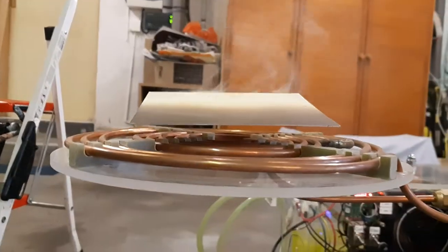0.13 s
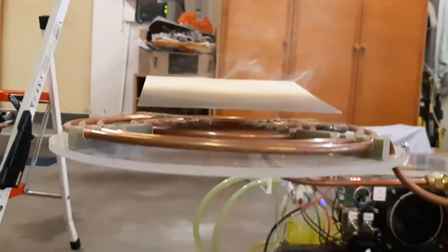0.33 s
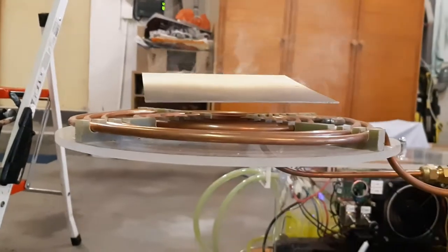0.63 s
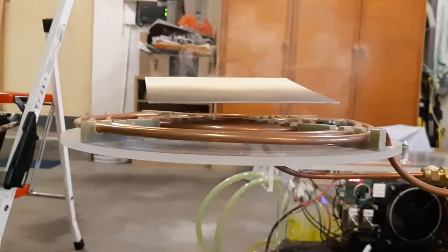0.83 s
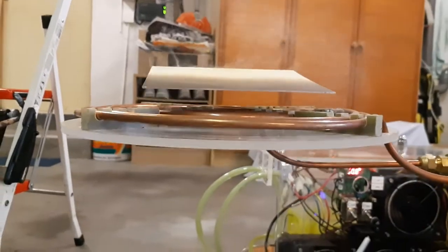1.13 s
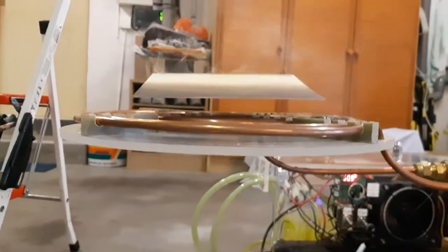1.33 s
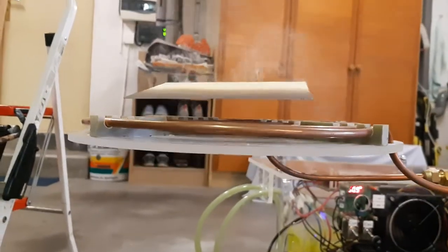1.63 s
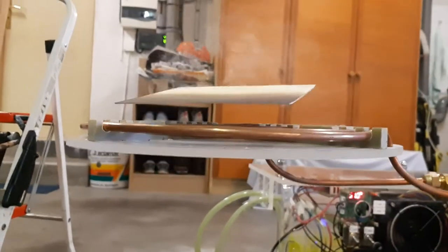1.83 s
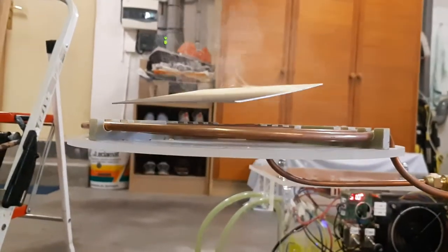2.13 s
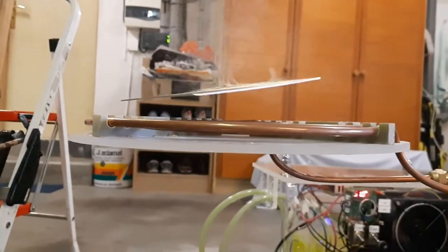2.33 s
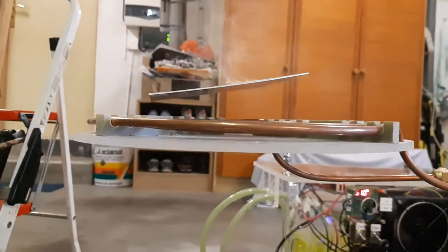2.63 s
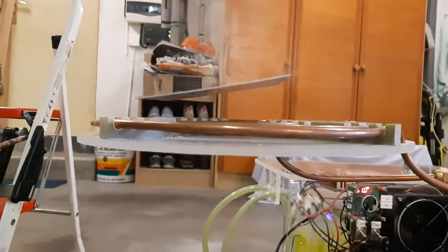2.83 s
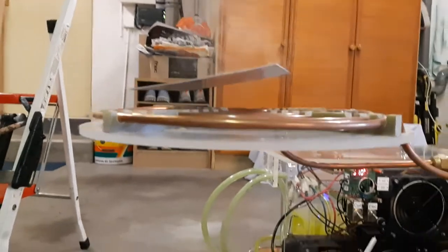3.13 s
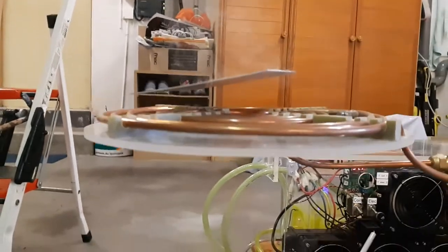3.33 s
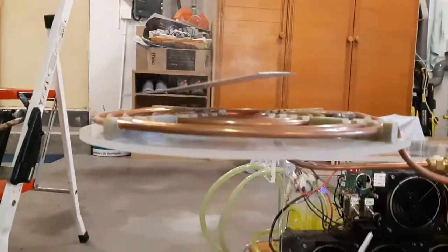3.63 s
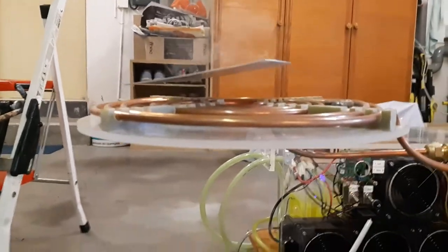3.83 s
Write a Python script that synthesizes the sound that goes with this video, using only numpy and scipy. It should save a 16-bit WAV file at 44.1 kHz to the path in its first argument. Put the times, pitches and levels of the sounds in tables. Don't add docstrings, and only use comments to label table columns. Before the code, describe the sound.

Cooling fan noise from a power unit, steady airy whoosh with a hollow low-mid hum

```python
import sys
import numpy as np
from scipy import signal
from scipy.fft import rfft, irfft, next_fast_len
from scipy.io import wavfile
from scipy.ndimage import uniform_filter1d

SR = 44100
rng = np.random.default_rng(int(sys.argv[2]) if len(sys.argv) > 2 else 0)


def digitize_waveform(pressure):
    field = np.atleast_2d(pressure).T
    bounded = np.clip(field, -1, 1)
    quanta = np.round(bounded * 32767).astype(np.int16)
    wavfile.write(sys.argv[1], SR, quanta)


def boost(x):
    u = np.asarray(x, float) / 20
    return 10 ** u


N = 175959
HZ = np.fft.rfftfreq(next_fast_len(N + 4096), 1 / SR)


def evened(x):
    return x / np.sqrt(np.mean(x ** 2) + 1e-20)


def sided(db, pan_db):
    return boost([[db + pan_db / 2], [db - pan_db / 2]])


def read(points):
    f, db = np.transpose(points)
    octaves, ends = np.log2(HZ + 1), np.log2(f)
    outside = np.maximum(ends[0] - octaves, 0) + np.maximum(octaves - ends[-1], 0)
    return boost(np.interp(octaves, ends, db) - 60 * outside)


def bands(centres_hz, rows, steep):
    power = 0
    for hz, (width_hz, db, pan_db) in zip(centres_hz, rows):
        resonance = 1 / (1 + (2 * (HZ - hz) / width_hz) ** 2) ** steep
        power = power + sided(db, pan_db) ** 2 * resonance
    return np.sqrt(power)


def slow(rate_hz):
    t = np.arange(0, N + 256, 256) / SR
    f = np.geomspace(rate_hz / 12, rate_hz, num=20)[:, None]
    sines = np.sin(2 * np.pi * (f * t + rng.random((20, 1))))
    drift = (sines / np.sqrt(f)).sum(0)
    return np.interp(np.arange(N) / SR, t, evened(drift))


def eddies(patchy_db, flicker_db, size):
    frames = N // 128 + 40
    a, b, patches = rng.standard_normal((frames, 257, 3)).T
    patches = uniform_filter1d(patches, size[0], 0)
    patches = evened(uniform_filter1d(patches, size[1], 1))
    flicker = evened(uniform_filter1d(rng.standard_normal(frames), size=9))
    cells = (a + 1j * b) * boost(patchy_db * patches + flicker_db * flicker)
    x = signal.istft(cells, nperseg=512, noverlap=384)[1]
    return rfft(evened(x), 2 * len(HZ) - 2) * np.sqrt(SR / 2)


def heard(spectrum, follow):
    # (time [s], level [dB])
    flow = [
        (0.0, -21),
        (0.31, -28),
        (0.44, -23.5),
        (1.78, -23.5),
        (2.04, -20.5),
        (2.09, -24.5),
        (2.73, -23),
        (2.74, -21),
        (3.68, -25),
        (3.99, -25),
    ]
    t, db = np.transpose(flow)
    swell_db = np.interp(np.arange(N) / SR, t, db) - db.mean()
    return irfft(spectrum)[:, 2000:2000 + N] * boost(follow * swell_db)


def lag(hz):
    # (frequency [Hz], phase [rad])
    port_lag = [(1150, .15), (1650, 2.1), (1980, 1.5), (2350, 2.2), (2580, 4.2), (2850, 3.3), (3950, 5.1),
                (4150, 4.7),
                (4400, 5.3), (4650, 3.8), (4900, 5.8), (5700, 5.4), (7600, 8.8), (8900, 12), (9700, 12.2),
                (13500, 21.8)]
    f, radians = np.transpose(np.array(port_lag))
    return np.interp(hz, f, radians) * np.array([[1], [0]])


def hum():
    mode_hz = [290, 376, 399, 428, 444, 460, 497, 558, 627, 720, 810, 850, 950, 1110]
    # (width [Hz], peak [dB per Hz], left-right [dB])
    modes = [(32, -60, 3), (18, -52.5, -5), (21.6, -47, 3.5), (20.4, -41, 2.7), (14, -39, -3.8),
             (12.9, -41, -1.5), (21.7, -43.5, 1), (43, -53, 8.5), (33, -50.5, 4), (17, -51, -6.5),
             (29, -54, 2), (69, -53.5, 3), (52, -60.5, 14.5), (56, -64.5, 2)]
    # (frequency [Hz], level [dB per Hz])
    body = [(20, -104), (75, -101), (130, -76), (260, -61.5), (450, -53), (700, -58), (1000, -59),
            (1500, -67.5)]
    # (frequency [Hz], width [Hz], depth [0-1])
    dips = [(332, 10, .6), (474, 10, .5), (655, 20, .4), (700, 14, .4), (742, 14, .5), (1015, 20, .4),
            (1062, 16, .5)]
    gain = np.sqrt(bands(mode_hz, modes, steep=2.35) ** 2 + read(body) ** 2)
    for hz, width_hz, depth in dips:
        gain = gain * (1 - depth / (1 + (2 * (HZ - hz) / width_hz) ** 2))
    return heard(gain * eddies(patchy_db=0.68, flicker_db=0.56, size=(3, 14)), follow=0.41)


def tones():
    tone_hz = [761, 878, 989, 1154, 1537, 3006, 673]
    # (rms [dB], pitch waver [Hz], level waver [dB], left-right [dB])
    tone_rows = [(-36.5, 4.5, 7, 1.1), (-40.5, 4, 6, 1.5), (-43, 5, 6, 3), (-48, 4, 6, .3), (-52, 4, 6, 3),
                 (-47, 5, 6, 2.5), (-49, 3, 6, .3)]
    out = np.zeros((2, N))
    for hz, (db, waver_hz, waver_db, pan_db) in zip(tone_hz, tone_rows):
        turns = np.cumsum(hz + waver_hz * slow(rate_hz=12)) / SR
        strength = evened(boost(waver_db * np.tanh(slow(rate_hz=20))))
        sine = np.sqrt(2) * np.sin(2 * np.pi * turns - lag(hz))
        out += sided(db, pan_db) * strength * sine
    return out


def hiss():
    grille_hz = [1350, 1650, 1900, 2250, 2700, 3020, 3400, 3980, 4650, 5200, 7500, 9400, 10700, 13500]
    # (width [Hz], peak [dB per Hz], left-right [dB])
    grille = [(306, -68, 6), (302, -61, 4.5), (360, -58.5, 3.5), (250, -62.5, -2), (320, -58, 7.5),
              (560, -54.5, 1.5), (405, -57, -0.5), (690, -57.5, 2.5), (250, -63, -2), (530, -66, -3),
              (900, -87, -4), (1400, -79, -2), (600, -86, 1.5), (1500, -95, .4)]
    noise = eddies(patchy_db=2.0, flicker_db=0.7, size=(4, 12))
    direct = bands(grille_hz, grille, steep=1.78) * noise
    return heard(direct * np.exp(-1j * lag(HZ)), follow=0.11)


def wash():
    # (frequency [Hz], level [dB per Hz])
    wash_low = [(200, -78), (900, -66), (1500, -62), (2400, -60), (3000, -58), (4300, -60), (5300, -65),
                (6200, -69)]
    # (frequency [Hz], level [dB per Hz])
    wash_high = [(5500, -86.5), (6600, -73), (7600, -78.5), (9600, -75), (10800, -78), (12500, -82),
                 (14000, -84.5), (15900, -86)]
    gain = np.sqrt(read(wash_low) ** 2 + read(wash_high) ** 2) * sided(0, pan_db=2.1)
    noise = [eddies(patchy_db=1.9, flicker_db=0.57, size=(4, 12)) for port in "LR"]
    return heard(gain * noise, follow=0.078)


def scene():
    return hum() + tones() + hiss() + wash()


def top_cut(x):
    return signal.sosfilt(signal.butter(12, 15750, fs=SR, output="sos"), x)


def record(dry):
    return top_cut(dry)


dry = scene()
out = record(dry)
digitize_waveform(out)
```